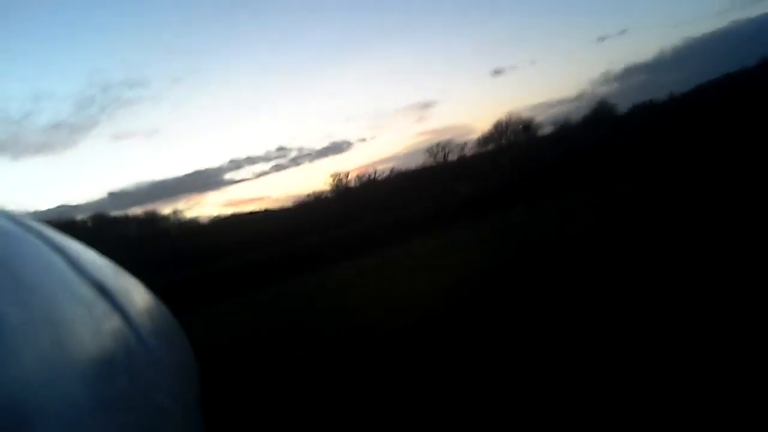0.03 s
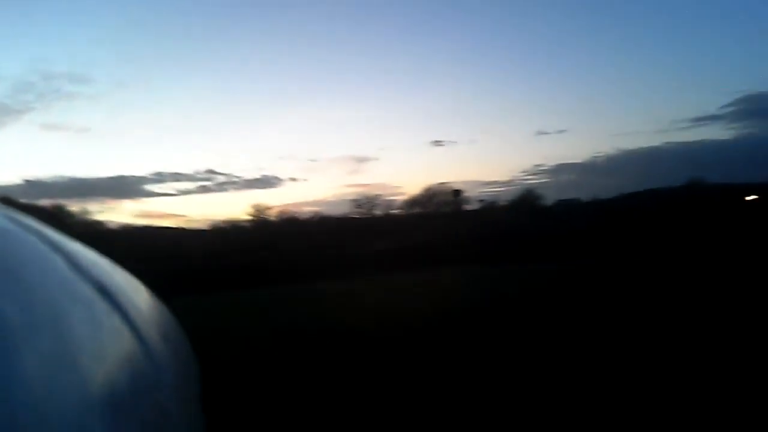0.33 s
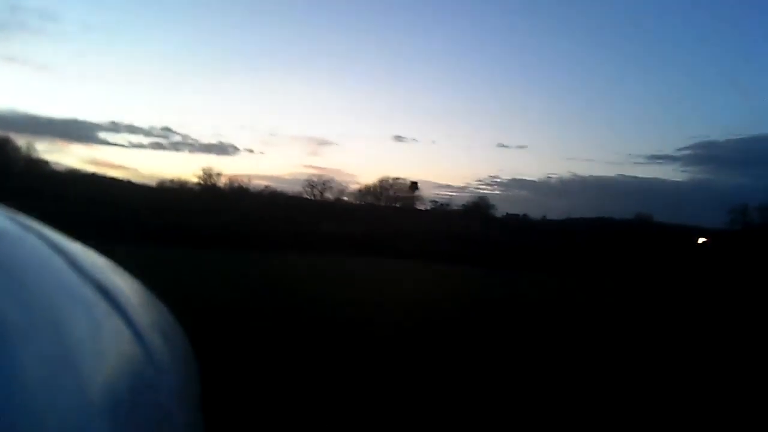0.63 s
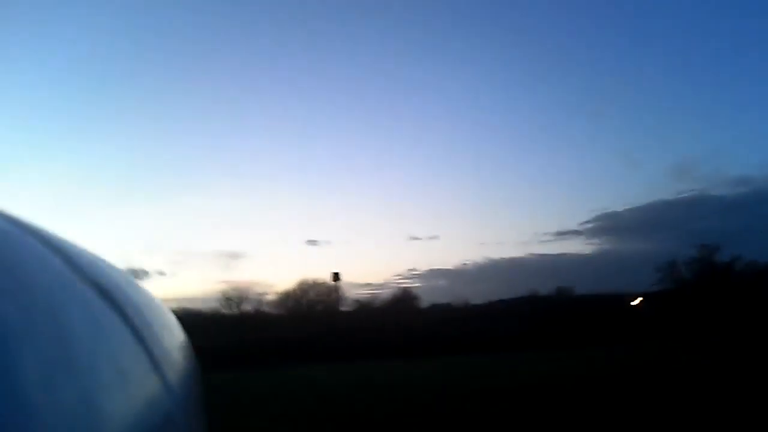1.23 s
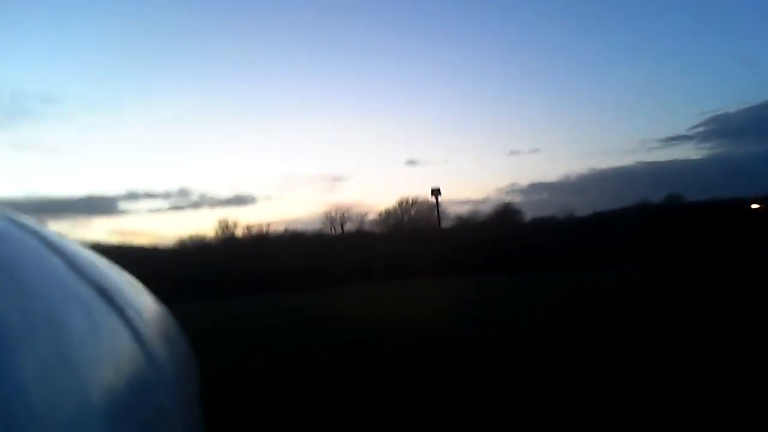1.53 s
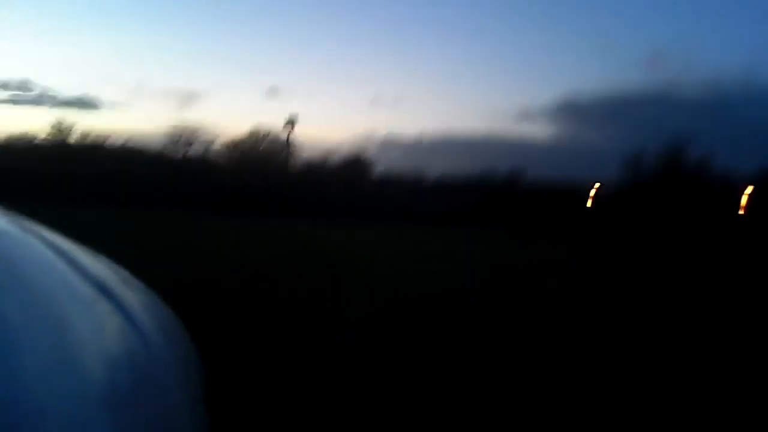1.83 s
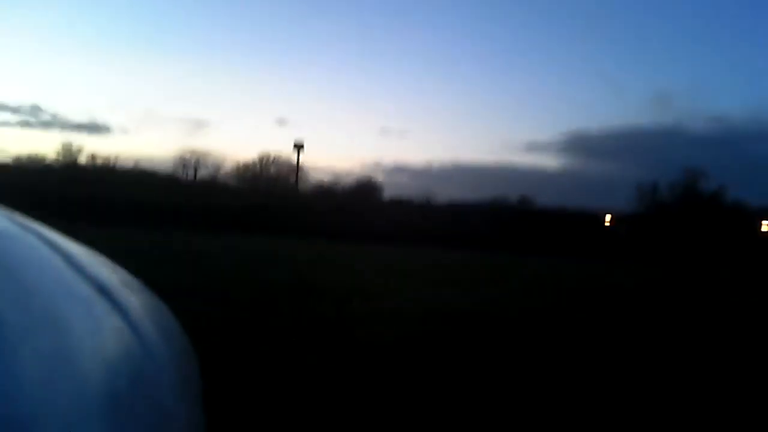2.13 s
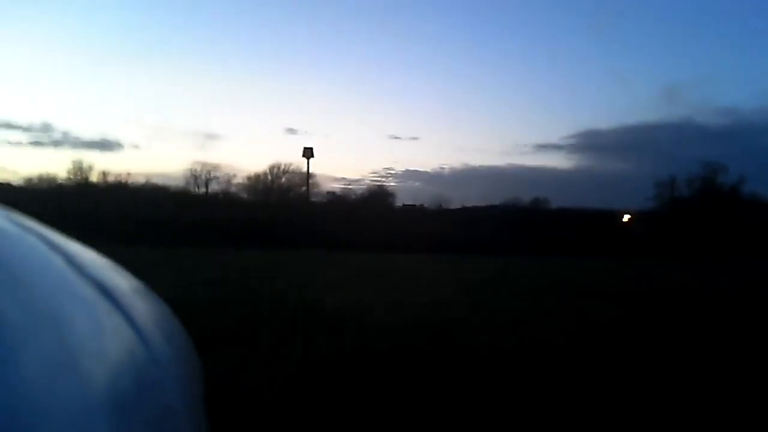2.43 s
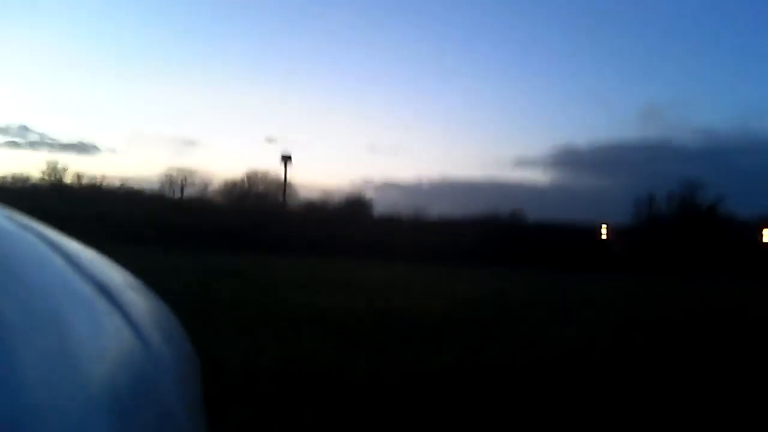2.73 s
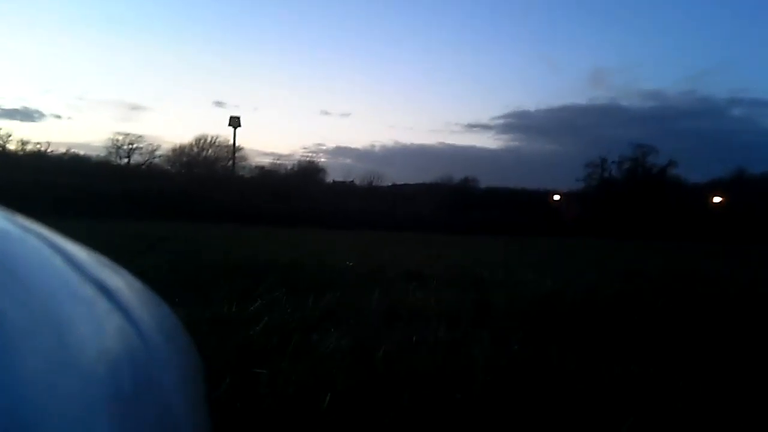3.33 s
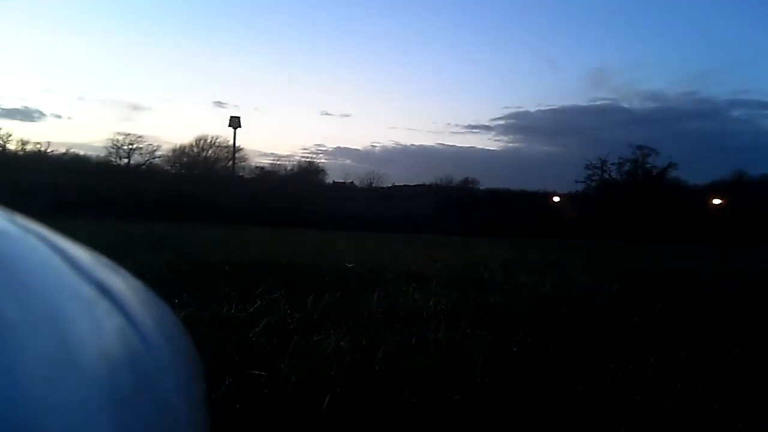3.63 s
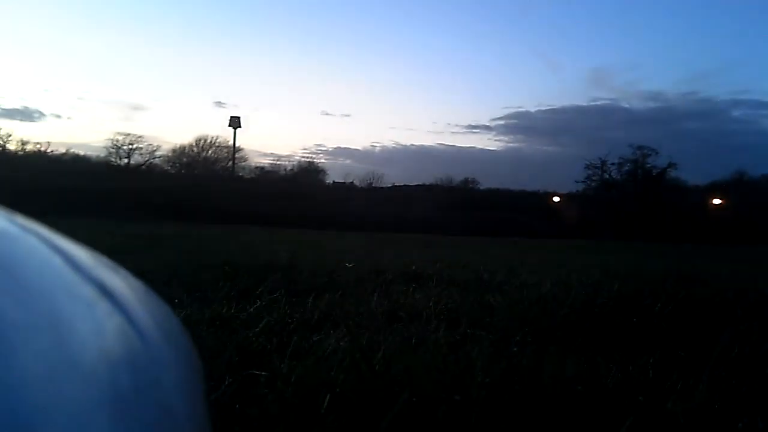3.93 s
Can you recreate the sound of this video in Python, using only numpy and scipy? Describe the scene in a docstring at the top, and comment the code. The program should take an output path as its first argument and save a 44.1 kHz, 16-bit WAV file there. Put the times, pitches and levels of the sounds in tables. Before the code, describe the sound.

Wind roars on the microphone, then a model plane bumps and slides to rest in grass.

```python
"""Wind roars on the microphone of a camera riding a small model plane as it glides in to land.
The rushing air overloads the microphone, then fades as the plane slows. The plane clips the grass
once, touches down, bumps and slides to rest. Grass swishes along its belly, knocks on its hollow body
and flicks its propeller into short falling whirrs. The camera hisses faintly underneath."""
import sys
import numpy as np
from scipy.fft import rfft, irfft, next_fast_len
from scipy.io import wavfile
from scipy.ndimage import map_coordinates

SR = 44100
rng = np.random.default_rng(int(sys.argv[2]) if len(sys.argv) > 2 else 0)


def dump(signal):
    """Clip the signal to [-1, 1] and save it as 16-bit WAV at the path in sys.argv[1]."""
    limited = np.clip(np.atleast_2d(signal).T, -1, 1)
    pcm = np.round(limited * 32767).astype(np.int16)
    wavfile.write(sys.argv[1], SR, pcm)


N = 176400

# sharp kicks of air on the microphone: time_s, level_db
AIR_KICKS = [(0.049, 1.5), (.223, 0), (.29, 2), (.326, 3), (.351, 6.5), (.403, 5.5), (.447, 3), (0.521, 4),
             (0.546, 0), (0.66, -0.5), (.815, 7), (0.865, 3.5), (0.966, 2.5)]
KICK_WIDTH_S = .0011
# how loudly the belly slides over the ground: time_s, level_db
SLIDE_LEVELS = [(1.74, -80), (1.78, -28), (2.2, -29), (2.3, -29.5), (2.42, -35), (2.55, -31), (2.76, -35.5),
                (2.85, -31), (2.97, -39), (3.04, -34), (3.09, -43.5), (3.2, -41.5), (3.33, -53.5),
                (3.45, -79), (3.6, -92)]
# the dry sound of grass hitting the plane: pitch_hz, level_db
RASP_SPECTRUM = [(300, -19), (700, -10.5), (1180, -24), (1580, -2.5), (1920, -5), (2260, 5), (2750, -6.5),
                 (3400, -32), (4000, -18), (4700, -14), (5700, -31), (6300, -17), (7100, -20),
                 (8300, -47.5), (12400, -34), (16000, -45.5)]


def airflow():
    """Swirling wind with sudden pressure kicks, over the rumble of the rocking plane."""
    # air rushing over the microphone: time_s, level_db
    wind_levels = [(0, -8.5), (.27, -9.5), (.33, -8), (.55, -8.5), (.78, -10), (.99, -8), (1.09, -10),
                   (1.18, -15.5), (1.22, -10.5), (1.44, -11), (1.52, -14.5), (1.76, -17.5), (1.88, -24),
                   (2.0, -20), (2.3, -31.5), (2.52, -27), (3.0, -43.5), (3.4, -58)]
    # its roar: pitch_hz, level_db
    wind_spectrum = [(20, -2.5), (110, 0), (230, 0), (350, -5.5), (520, -5.5), (640, -10), (800, -23),
                     (1120, -46.5), (1750, -36.5), (2130, -30), (2500, -45), (3300, -68), (4450, -53),
                     (5500, -68), (6600, -63.5), (8500, -79.5), (16000, -88.5)]
    # the plane rocking: time_s, level_db
    rocking_levels = [(0, -20.5), (1.0, -14), (1.35, -20.5), (1.6, -27), (2.15, -24), (2.4, -29),
                      (2.7, -34), (3.03, -31), (3.12, -43), (3.45, -37), (3.72, -41.5), (3.9, -32),
                      (4.0, -42)]
    # its low rumble: pitch_hz, level_db
    rocking_spectrum = [(8, -23.5), (28, 5.5), (65, 1.5), (125, -3), (200, -17.5), (450, -29), (900, -38),
                        (2000, -73)]
    wind = noise(wind_spectrum) * level(wind_levels) * amp(0.9 * wobble(41))
    for time_s, level_db in AIR_KICKS:
        t = clock() - time_s
        dip = 1 - 0.55 * bell_curve(t, width_s=0.0013)  # the roar dips under each kick
        width_s = KICK_WIDTH_S * np.exp(rng.normal(0, 0.05))
        kick = (1 - (t / width_s) ** 2) * bell_curve(t, width_s)
        wind = wind * dip + rng.choice([-1, 1]) * amp(level_db) * kick
    return wind + noise(rocking_spectrum) * level(rocking_levels) * amp(.7 * wobble(16))


def overload_ticks():
    """Each kick of air makes the overloaded microphone tick."""
    # a bright tick: pitch_hz, level_db
    tick_spectrum = [(500, -22), (2000, 9.5), (3500, 5), (7000, -7.5), (16000, -16.5)]
    clicks = np.zeros(N)
    for time_s, level_db in AIR_KICKS:
        add(clicks, time_s - KICK_WIDTH_S, amp([level_db - 24]))
    return colour(clicks, tick_spectrum)


def grass():
    """Blades swish along the belly; stiff stalks crackle, ever fewer as the plane slows."""
    # blades brushing the belly: time_s, level_db
    swish_levels = [(.975, -64), (.995, -27.5), (1.017, -19), (1.035, -27.5), (1.06, -22.5), (1.095, -32.5),
                    (1.125, -56), (1.3, -76.5), (1.75, -62.5), (1.78, -28), (1.82, -30.5), (1.86, -40),
                    (1.90, -52), (1.92, -24.5), (1.985, -49), (2.04, -32), (2.16, -49), (2.2, -33),
                    (2.25, -34), (2.33, -41.5), (2.385, -31.5), (2.43, -43), (2.52, -38), (2.59, -44),
                    (2.65, -35.5), (2.78, -47), (2.825, -37), (2.9, -46), (2.97, -46), (3.04, -39.5),
                    (3.11, -49.5), (3.2, -47), (3.35, -61.5), (3.45, -76)]
    # their swish: pitch_hz, level_db
    swish_spectrum = [(200, -24.5), (600, 9.5), (1150, -7.5), (1600, 3.5), (2250, 7), (3350, -13.5),
                      (4500, 1), (5650, -13), (6700, -2), (8400, -16.5), (10700, -17), (12400, -5.5),
                      (14000, -15), (16000, -22.5)]
    # the crackle of stalks: pitch_hz, level_db
    stalk_spectrum = [(100, -33), (300, -17.5), (480, 5), (680, 1.5), (900, -12), (1200, -30), (1560, -8),
                      (1900, -10.5), (2230, 2), (2650, -24), (3350, -49.5), (4450, -21), (5600, -37.5),
                      (6700, -31), (8500, -51.5), (16000, -55.5)]
    touchdown_s = 1.76
    swish = unit(colour(grains(per_s=3200, spread_db=2), swish_spectrum))
    swish = swish * level(swish_levels) * amp(1.4 * wobble(120))
    snaps_per_s = 480 * np.exp(-np.maximum(clock() - touchdown_s, 0))
    boost = np.sqrt(snaps_per_s.mean() / snaps_per_s)  # keeps the level even as snaps thin out
    snaps = grains(per_s=snaps_per_s, spread_db=3.5) * boost
    crackle = unit(colour(snaps + amp(-5) * rng.standard_normal(N), stalk_spectrum))
    return swish + crackle * level(SLIDE_LEVELS) * amp(1.2 * wobble(50))


def propeller():
    """Grass grabs the propeller with a rough burst; a whirr sinks as it slows and a dry rasp lingers."""
    # flicks of the propeller: start_s, pitch_hz, fall_per_s, hold_s, whirr_db, rasp_db
    flicks = [(1.044, 1056, 11, 0.065, -18, -20.5), (1.789, 660, 6.1, 0.035, -18, -35.5),
              (1.873, 800, 9, 0.0065, -12, -42), (1.913, 842.4, 6.4, 0.0067, -11.5, -21),
              (1.925, 667, 5.2, 0.018, -10, -41.5), (2.09, 800, 9.5, 0.026, -15, -21),
              (2.189, 628, 1.9, 0.013, -15.5, -36)]
    # the rough burst: pitch_hz, level_db
    grab_spectrum = [(200, -22.5), (480, -3), (780, 1.5), (900, -19.5), (1030, -28.5), (3000, -60.5)]
    attack_s, release_s, grab_s, rasp_fade_db_per_s = .004, 0.0077, 0.0076, 75
    whirr, rasp, grab = np.zeros((3, N))
    for start_s, pitch_hz, fall_per_s, hold_s, whirr_db, rasp_db in flicks:
        t = np.maximum(clock() - start_s, 0)
        falling_hz = pitch_hz * np.exp(-fall_per_s * t) * (1 + 0.018 * wobble(400))
        wave = np.sin(2 * np.pi * np.cumsum(falling_hz) / SR)
        attack = 1 - np.exp(-t / attack_s)
        release = np.exp(-np.maximum(t - hold_s, 0) / release_s)
        whirr += amp(whirr_db + 0.5 * wobble(240)) * attack * release * np.sqrt(2) * wave
        grab += amp(whirr_db + 1.5) * attack * np.exp(-t / grab_s)
        pulsing_grit = (1 + 0.17 * wave) * grains(per_s=2500, spread_db=-1)
        rasp += amp(rasp_db - rasp_fade_db_per_s * t) * attack * pulsing_grit
    return whirr + grab * noise(grab_spectrum) + colour(rasp, RASP_SPECTRUM)


def knocks():
    """Tufts strike the body: it rings with a hollow thud, topped by a bright snap and a short scuff."""
    # blows on the body: start_s, thud_db, snap_db
    blows = [(.9917, -17, -20), (1.018, -10, -18), (1.096, -31, -17), (1.722, -47, -44), (1.7665, -30, -26),
             (1.7849, -11.5, -15), (1.796, -11, -20.5), (1.8204, -14, -19), (1.8598, -23, -24.5),
             (1.876, -17.5, -15.5), (1.882, -27, -15.5), (1.909, -14, -16), (1.9715, -22, -26),
             (2.017, -19, -24.5), (2.0763, -41, -17.5), (2.196, -21, -16.5), (2.2204, -12, -14.5),
             (2.3242, -40, -22.5), (2.3651, -20, -24), (2.4484, -12, -22.5), (2.4565, -9, -20),
             (2.4675, -14, -20.5), (2.483, -14.5, -32), (2.496, -14.5, -33.5), (2.5133, -39, -18.5),
             (2.532, -18, -22.5), (2.571, -23.5, -43), (2.5966, -40, -31.5), (2.6175, -48, -26.5),
             (2.633, -26, -21), (2.825, -31, -37), (2.841, -30, -29), (2.9228, -52, -29),
             (3.035, -28.5, -30), (3.285, -48, -43)]
    # the body's own notes: pitch_hz, level_db, ring_s (time to fade by 60 dB)
    body_notes = [(257, -14.5, 0.057), (427, -13, 0.069), (480, -0.5, 0.069), (575, 6, 0.035),
                  (712, 0, 0.03), (800, -17, 0.041)]
    thud_gain, snap_gain = np.sqrt(0.0054 * SR), np.sqrt(0.0033 * SR)
    attack_s, scuff_s = 0.0024, .004
    thuds, snaps = np.zeros((2, N))
    t = np.arange(SR // 10) / SR
    for start_s, thud_db, snap_db in blows:
        tilt_db_per_octave = 0.26 * (thud_db + 20)  # heavy blows favour the low notes
        ring = np.zeros(len(t))
        for pitch_hz, level_db, ring_s in body_notes:
            note_db = level_db - tilt_db_per_octave * np.log2(pitch_hz) + rng.normal(0, 5.1)
            note_hz = pitch_hz * (1 + rng.normal(0, 0.026))
            ring += amp(note_db - 60 * t / ring_s) * np.sin(2 * np.pi * note_hz * t)
        ring *= 1 - np.exp(-t / attack_s)
        add(thuds, start_s, amp(thud_db) * thud_gain * ring / np.linalg.norm(ring))
        click = amp(-11) * (t == 0)
        scuff = rng.standard_normal(len(t)) * np.exp(-t / scuff_s)
        scuff *= amp(-1) / np.linalg.norm(scuff)
        add(snaps, start_s, amp(snap_db) * snap_gain * (click + scuff))
    return thuds + colour(snaps, RASP_SPECTRUM)


def ground_rumble():
    """The belly rumbles over uneven turf while it slides."""
    # the deep rumble: pitch_hz, level_db
    turf_spectrum = [(20, -19), (70, 0.5), (125, -0.5), (220, -4.5), (320, -13), (700, -40), (2000, -76.5)]
    return amp(-1.5) * noise(turf_spectrum) * level(SLIDE_LEVELS)


def settling():
    """Dull bumps as the plane stops and tips into the grass."""
    # soft bumps: time_s, level_db, half_width_s
    bumps = [(3.3, -37.5, 0.018), (3.461, -40, 0.0056), (3.907, -32, .02)]
    # their dull sound: pitch_hz, level_db
    bump_spectrum = [(20, -17), (60, -6), (105, -3), (150, -6.5), (200, -2.5), (300, -16.5), (430, -15.5),
                     (700, -34), (2000, -83)]
    swells = sum(amp(db) * bell_curve(clock() - time_s, width_s) for time_s, db, width_s in bumps)
    return noise(bump_spectrum) * swells


def camera_hiss():
    """The camera's electronics add a steady hiss and a faint whine."""
    # the hiss: pitch_hz, level_db
    hiss_spectrum = [(20, 4.5), (500, 9.5), (1000, 6.5), (2000, 3.5), (4000, 0), (6500, -3), (9000, -4.5),
                     (16000, -4.5)]
    whine_hz = 6500
    return amp(-56) * noise(hiss_spectrum) + amp(-75) * np.sin(2 * np.pi * whine_hz * clock())


def amp(db):
    """Decibels to gain."""
    return 10 ** (np.asarray(db) / 20)


def unit(x):
    """Scale to an average power of 1."""
    return x / np.sqrt(np.mean(x ** 2) + 1e-20)


def clock():
    """The time of every sample, in seconds."""
    return np.arange(N) / SR


def bell_curve(t, width_s):
    """A smooth hump that peaks at t = 0."""
    return np.exp(-.5 * (t / width_s) ** 2)


def level(rows):
    """Gain per sample from rows of time_s, level_db."""
    return amp(np.interp(clock(), *np.transpose(rows)))


def wobble(per_s):
    """A smooth curve through per_s random values a second."""
    return map_coordinates(rng.standard_normal(8192), [np.arange(N) * per_s / SR], mode="wrap")


def colour(x, spectrum):
    """Filter a sound to the shape given by rows of pitch_hz, level_db."""
    size = 2 * next_fast_len(N // 2 + 8192)
    hz, db = np.transpose(spectrum)
    gain = amp(np.interp(np.log(np.fft.rfftfreq(size, 1 / SR) + 1), np.log(hz + 1), db))
    # fold the filter so that it rings only after a click, never before
    cepstrum = irfft(np.log(unit(gain) + 1e-9), size)
    cepstrum[1:size // 2] *= 2
    cepstrum[size // 2 + 1:] = 0
    return irfft(rfft(x, size) * np.exp(rfft(cepstrum)), size)[:N]


def noise(spectrum):
    """Steady noise with the given spectrum."""
    return unit(colour(rng.standard_normal(N), spectrum))


def grains(per_s, spread_db):
    """Random tiny snaps of uneven size."""
    happens = rng.random(N) < per_s / SR
    size = amp(spread_db * np.clip(rng.standard_normal(N), -2, 2))
    return unit(happens * rng.choice([-1, 1], N) * size)


def add(track, start_s, sound):
    """Mix a sound into a track."""
    part = track[round(start_s * SR):][:len(sound)]
    part += sound[:len(part)]


def scene():
    """Everything reaches one microphone on the plane."""
    air = airflow() + overload_ticks()
    landing = grass() + ground_rumble() + propeller() + knocks() + settling()
    return (air + landing + camera_hiss())[None]


def record(dry):
    """The camera flattens the strongest gusts and cuts off the highest treble."""
    top_hz = 16000
    clipped = dry / (1 + np.abs(dry) ** 10) ** (1 / 10)
    size = next_fast_len(N + SR // 2)
    kept = np.fft.rfftfreq(size, 1 / SR) < top_hz
    return irfft(rfft(clipped, size) * kept, size)[..., :N]


dry = scene()
out = record(dry)
dump(out)
```